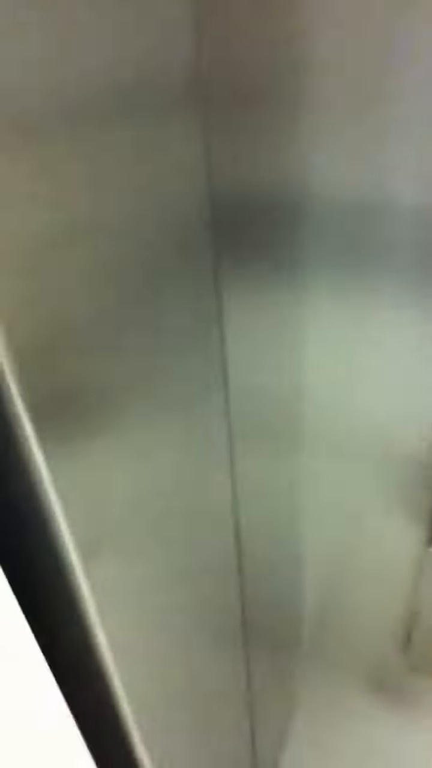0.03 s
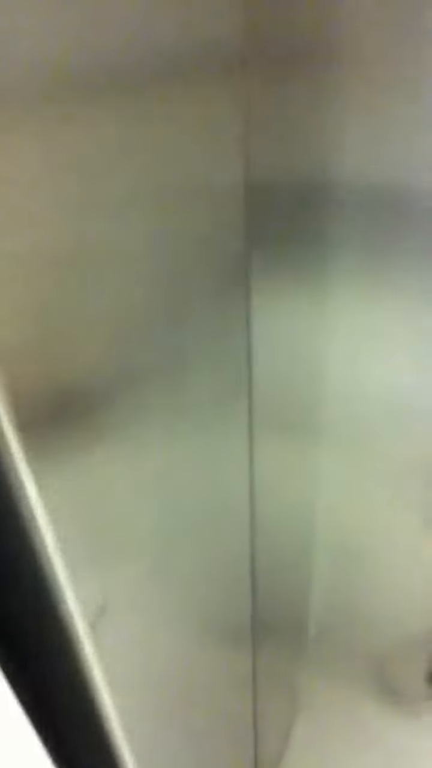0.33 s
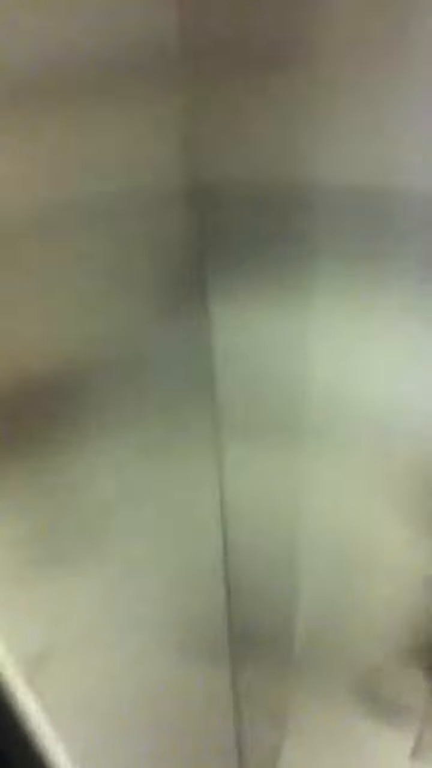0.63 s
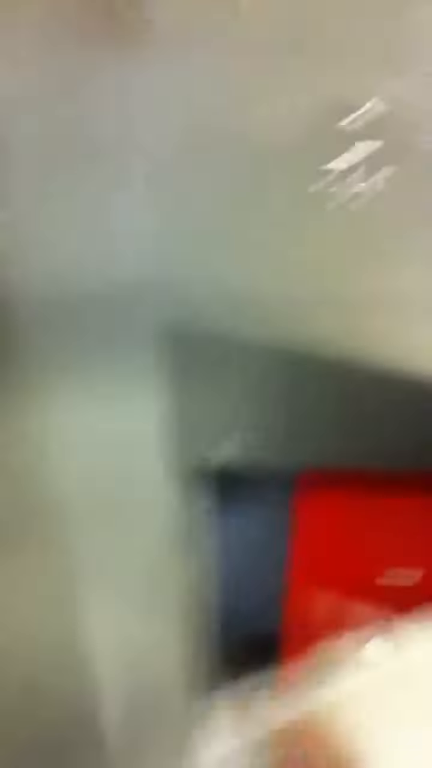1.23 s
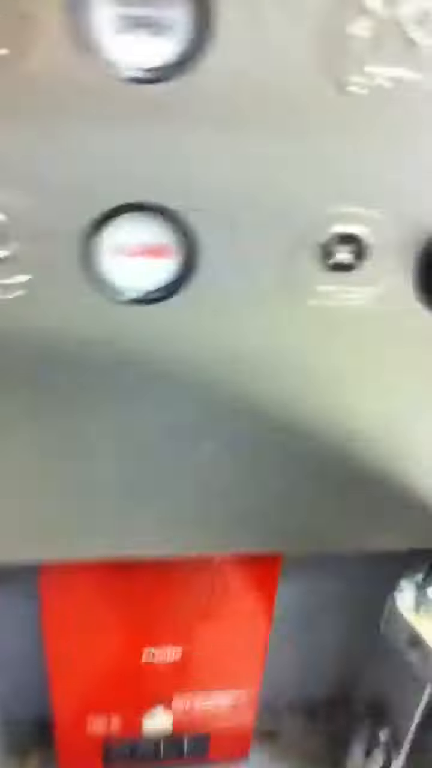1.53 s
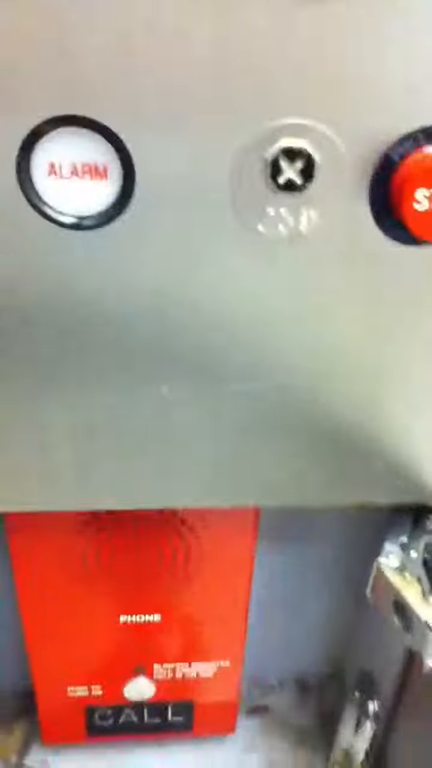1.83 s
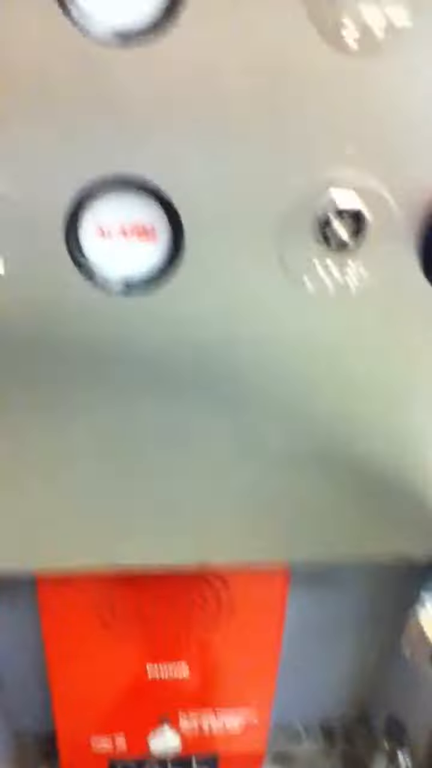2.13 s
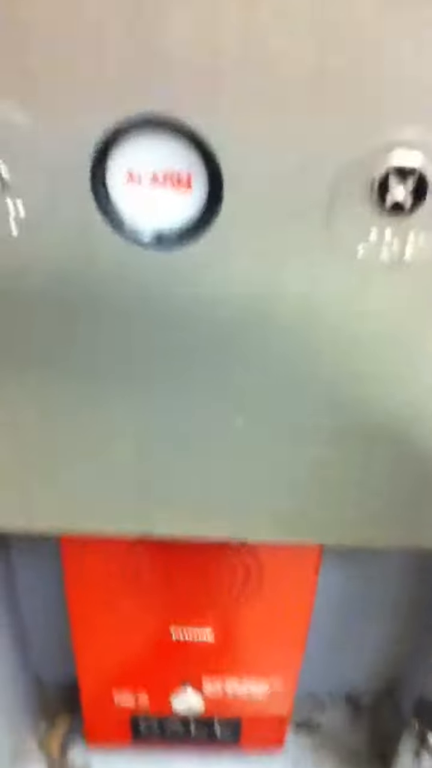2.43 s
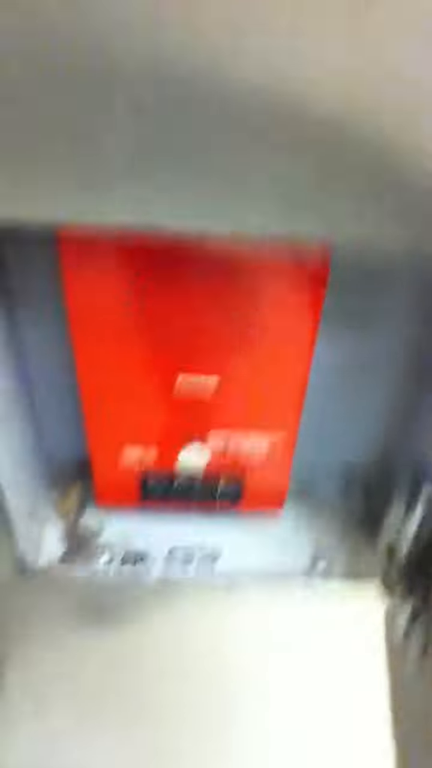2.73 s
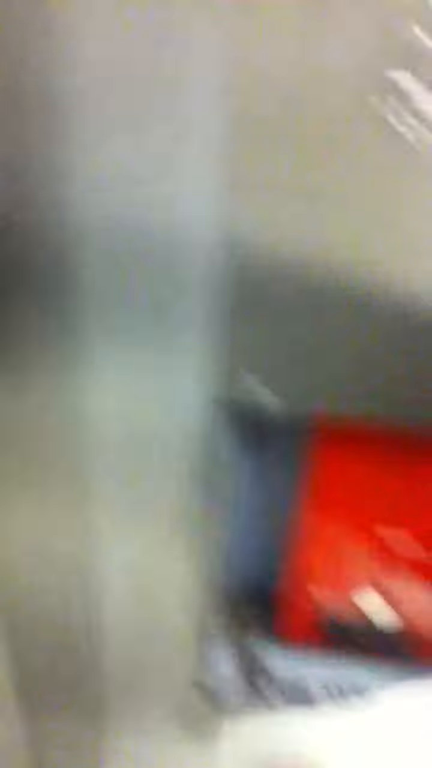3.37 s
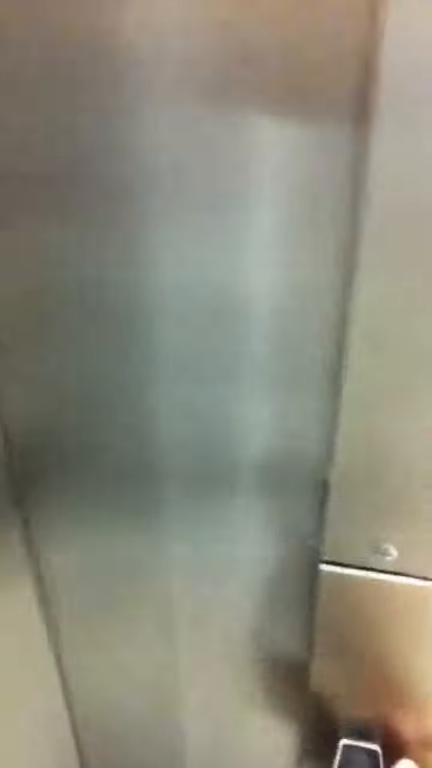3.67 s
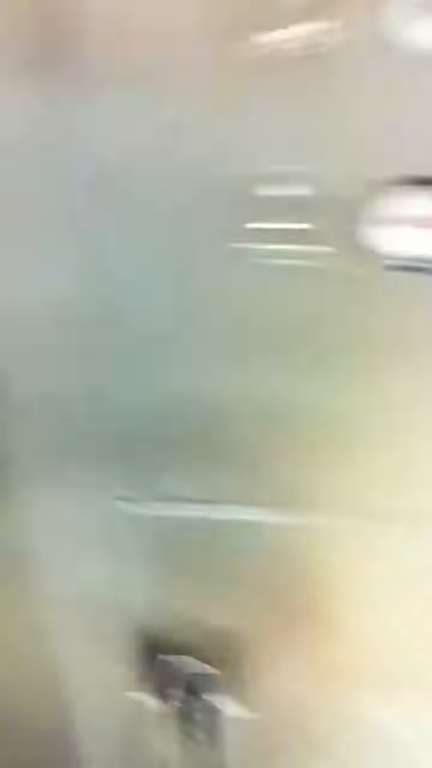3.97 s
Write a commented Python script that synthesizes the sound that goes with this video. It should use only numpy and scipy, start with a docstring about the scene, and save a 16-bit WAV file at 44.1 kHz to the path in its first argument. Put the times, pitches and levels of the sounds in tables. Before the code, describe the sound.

A small metal door bangs shut in an elevator at about 3.6 seconds, rattling briefly and making the walls boom. Before that, a faint clink sounds at the start, a hand scuffs, and the latch clicks at 1.7 seconds. Soft knocks and finger taps follow, then low panel thuds around 3.4 seconds. Ventilation and machinery hum steadily throughout.

```python
"""A little metal door bangs shut in a steel elevator cab, rattles and sets the walls booming.
Before the bang, this phone compartment door clicks at its latch and the cab panels thud in low modes.
Metal clinks, a hand scuffs and taps, and dull knocks sound around the cab.
Throughout, ventilation rushes and machinery hums through the cab's low resonances."""
import sys
import numpy as np
from scipy import signal
from scipy.fft import rfft, irfft
from scipy.io import wavfile
from scipy.ndimage import uniform_filter1d

SR = 44100
rng = np.random.default_rng(int(sys.argv[2]) if len(sys.argv) > 2 else 0)


def persist_wave(psi):
    """Save psi, clipped to +-1, as 16-bit WAV."""
    counts = np.round(np.clip(psi, -1, 1) * 32767).astype(np.int16)
    wavfile.write(sys.argv[1], SR, np.atleast_2d(counts).T)


N = 176400
T = np.arange(N) / SR
RING_T = T[:SR]  # 1 s per struck sound


def amp(db):
    """Decibels to gain."""
    return 10 ** (np.asarray(db) / 20)


def unit(x):
    """Scale to rms 1."""
    return x / np.sqrt(np.mean(x ** 2) + 1e-20)


def at_hz(points, hz):
    """Interpolate on a log-frequency axis."""
    f, value = np.transpose(points)
    return np.interp(np.log(hz + 1), np.log(f), value)


def level(points):
    """Gain over time from a dB curve."""
    return amp(np.interp(T, *np.transpose(points)))


def add(mix, start_s, sound):
    """Mix a sound in at start_s."""
    part = mix[round(start_s * SR):][:len(sound)]
    part += sound[:len(part)]


def noise(colour, size):
    """Noise of a given spectral shape, rms 1."""
    gain = amp(at_hz(colour, np.fft.rfftfreq(size, 1 / SR)))
    return unit(irfft(rfft(rng.standard_normal(size)) * gain, size))


def narrow(hz, width_hz):
    """Wavering tone: noise in one narrow resonance, rms 1."""
    f = np.fft.rfftfreq(N, 1 / SR)
    phases = np.exp(2j * np.pi * rng.random(len(f)))
    return unit(irfft(phases / (1 + ((f - hz) / width_hz * 2) ** 2), N))


def ring(modes, attack_s, in_phase=False):
    """Decaying modes of a struck object; a single shove starts them in phase."""
    out = np.zeros(SR)
    for hz, db, t60_s in modes:
        phase = 0 if in_phase else rng.random()
        out += amp(db - 60 * RING_T / t60_s) * np.sin(2 * np.pi * (hz * RING_T + phase))
    return np.minimum(RING_T / attack_s, 1) * out


def contact(colour, attack_s, decay_s, tail_db):
    """Noise crack plus cab reflections decaying band by band."""
    # cab reverberation (frequency [Hz], t60 [s])
    cab_t60 = [(150, 0.8), (500, 0.69), (1000, 0.43), (2000, 0.35), (4000, 0.35), (8000, 0.23),
               (15000, 0.2)]
    hz, t, bands = signal.stft(noise(colour, SR), SR, nperseg=256)
    fade = amp(-60 * t / at_hz(cab_t60, hz)[:, None])
    tail = signal.istft(bands * fade, SR, nperseg=256)[1][:SR]
    crack = noise(colour, SR) * np.exp(-RING_T / decay_s)
    return np.minimum(RING_T / attack_s, 1) * (crack + amp(tail_db) * tail)


def door(bang_s=3.6174):
    """Door swings, hits its frame, rattles and rings; the box behind it and the walls shake."""
    # swing hiss (time [s], rms level [dB])
    swing = [(3.1, -100), (3.3, -57), (3.4, -56.5), (3.6, -51), (3.8, -55.5), (3.95, -59), (4, -57)]
    # slam, then rattles (delay [s], level [dB])
    hits = [(0, -12.5), (.013, -32), (.041, -32), (.053, -30), (.073, -33.5)]
    # wall jolts (time [s], level [dB])
    booms = [(3.623, -19), (3.657, -18.5), (3.706, -19), (3.768, -28)]
    # spectra of swing, hit and hollow box (frequency [Hz], level [dB])
    swing_colour = [(300, 9), (1000, -7), (3000, 4), (6000, 0), (10000, -7), (15000, -23)]
    hit_colour = [(200, -1), (600, 0), (1300, 0.5), (1800, 3.5), (3000, 2), (5300, 0), (7500, -2.5),
                  (9000, -11), (11000, -23), (15000, -27)]
    box_colour = [(150, -5.5), (330, -3), (520, -1.5), (750, -8), (1300, -16), (2500, -20.5), (8000, -55)]
    # door and wall modes (frequency [Hz], level [dB], t60 [s])
    door_modes = [(936, -5.5, .14), (1385, -4, 0.086), (1610, -27, 0.055), (1760, 5, 0.056),
                  (2020, -16, 0.38), (2520, -4.5, .06), (2700, -4, 0.11), (3050, -16, 0.24),
                  (3270, -9, 0.18), (3780, -6, .06), (4070, -5.5, 0.092), (4490, -14, 0.22),
                  (4530, -4, 0.046), (4870, -12, 0.057), (5160, 3, 0.037), (5560, -10, 0.12),
                  (6070, -7, 0.092), (6320, -3, 0.044), (6420, -1, 0.06), (7600, -3, .05)]
    wall_modes = [(83.7, -19, 0.47), (151, -1.5, 0.17), (171.2, -1, 0.52), (203.6, -4.5, 0.71),
                  (240.4, 4.5, 0.35), (258.6, -1.5, 0.45), (292.3, -3.5, 0.39), (420.7, -13, 0.42),
                  (460, -6, 0.22), (521, -11, .55), (589, -14.5, 0.24), (653, -29, 0.54), (836, -26, 0.27),
                  (941, -22, 0.18)]
    out = level(swing) * noise(swing_colour, N)
    for delay_s, db in hits:
        crack = amp(-2) * contact(hit_colour, attack_s=0.0024, decay_s=0.004, tail_db=-8.5)
        metal = amp(-10) * ring(door_modes, attack_s=0.0028)
        add(out, bang_s + delay_s, amp(db) * (crack + metal))
    add(out, bang_s, amp(-18) * contact(box_colour, attack_s=0.028, decay_s=0.054, tail_db=-10))
    for start_s, db in booms:
        add(out, start_s, amp(db) * ring(wall_modes, attack_s=0.0027, in_phase=True))
    return out


def panel_thuds():
    """Shoves excite the low modes of the cab panels."""
    # shoves (time [s], level [dB])
    thuds = [(2.868, -25.5), (3.372, -16), (3.414, -13.5), (3.457, -11.5), (3.529, -15)]
    # panel modes (frequency [Hz], level [dB], t60 [s])
    modes = [(84, -19, 0.28), (116, -5, 0.15), (148.7, 0.5, 0.29), (163, 6.5, 0.089), (199.4, -1.5, 0.24),
             (241.3, 0, 0.184), (279.8, -3.5, 0.188), (336, -15, 0.42)]
    out = np.zeros(N)
    for start_s, db in thuds:
        add(out, start_s, amp(db) * ring(modes, attack_s=0.0075, in_phase=True))
    return out


def latch():
    """Latch snaps, rings and shakes the walls."""
    # click (time [s], level [dB], wall boom level [dB])
    clicks = [(1.711, -26, -20.5)]
    # snap spectrum (frequency [Hz], level [dB])
    colour = [(200, 2), (600, 15), (1400, 6.5), (2600, -3.5), (4500, 0.5), (6000, 0), (9000, -2.5),
              (15000, -21)]
    # latch and wall modes (frequency [Hz], level [dB], t60 [s])
    latch_modes = [(1477, -6, .2), (1920, -11, 0.24), (2340, -4, 0.056), (3100, -6, 0.066),
                   (4070, -3, 0.052), (4270, 6.5, 0.023), (5880, 7, 0.018), (8250, -11, .07),
                   (8870, -18, 0.053)]
    wall_modes = [(159, -16, 0.22), (228, -3, 0.2), (260, -2, .2), (323, -1, 0.23)]
    out = np.zeros(N)
    for start_s, db, boom_db in clicks:
        snap = contact(colour, attack_s=0.00073, decay_s=0.003, tail_db=-11.5)
        metal = amp(-9.5) * ring(latch_modes, attack_s=0.0006)
        boom = ring(wall_modes, attack_s=0.0025, in_phase=True)
        add(out, start_s, amp(db) * (snap + metal) + amp(boom_db) * boom)
    return out


def knocks():
    """Dull contacts around the cab, each with a faint ring."""
    # knocks (time [s], level [dB], attack [s])
    hits = [(.5, -43.5, .006), (.563, -44.5, 0.0016), (.655, -45.5, 0.0046), (1.916, -40, 0.0061),
            (1.95, -57, .006), (2.007, -37, 0.0087), (2.09, -42.5, 0.0087), (2.354, -38, 0.01),
            (2.418, -39.5, 0.0088), (2.569, -46, .01), (2.68, -43.5, 0.0074), (2.829, -40, 0.03),
            (2.961, -35.5, 0.0038), (3.036, -34.5, 0.0033), (3.116, -39.5, 0.0056), (3.375, -32.5, 0.01),
            (3.435, -34, 0.013), (3.5, -40, 0.01), (3.549, -37, 0.017), (3.737, -37, .004),
            (3.812, -35.5, 0.0022), (3.878, -38, .008)]
    # knock spectrum (frequency [Hz], level [dB])
    colour = [(150, -8), (400, 2), (600, 0), (950, 0.5), (1300, -6), (1800, -7.5), (2800, -18), (6000, -23),
              (14000, -73)]
    # ringing modes (frequency [Hz], level [dB], t60 [s])
    modes = [(390.6, -3.5, 0.9), (506, 3.5, 0.68), (603, -4, 0.92), (653, -2, 1), (788, 4, 0.21),
             (781, 0.5, 0.2), (894, -6.5, 0.78), (948, -10, 0.26), (1110, -2, 0.29), (1340, -5.5, 0.44)]
    out = np.zeros(N)
    for start_s, db, attack_s in hits:
        knock = contact(colour, attack_s, decay_s=0.0066, tail_db=-2.5)
        add(out, start_s, amp(db) * (knock + amp(-9) * ring(modes, attack_s)))
    return out


def clink():
    """Small metal piece rings and scrapes in three quick contacts."""
    # contacts (time [s], level [dB])
    hits = [(.078, -54), (.085, -36.5), (.101, -48)]
    # metal modes (frequency [Hz], level [dB], t60 [s])
    modes = [(2654, -1, .22), (3250, -11, .12), (3410, -10, .15), (4160, -17, .6), (4740, -11, .18),
             (5087, -5, .21), (7973, -6, .11), (8080, -4, .09), (9520, -12, .11), (9857, -17, .2)]
    # scrape spectrum (frequency [Hz], level [dB])
    colour = [(1000, -20), (2700, 3), (3500, -2), (5000, -3), (6500, -2), (8200, -8), (9000, -5),
              (15000, -20)]
    out = np.zeros(N)
    for start_s, db in hits:
        metal = ring(modes, attack_s=0.0013)
        scrape = amp(-9) * contact(colour, attack_s=0.0027, decay_s=0.006, tail_db=-1)
        add(out, start_s, amp(db) * (metal + scrape))
    return out


def hand():
    """Hand scuffs the door lightly; fingers tap crisply on the panel."""
    # scuffs (time [s], level [dB], attack [s])
    scuffs = [(.497, -48.5, 0.0056), (.66, -49, .002), (1.343, -53, .002), (1.41, -53, 0.018),
              (1.555, -39.5, 0.016), (1.591, -42, 0.011), (2.975, -50, .003), (3.051, -49.5, .003)]
    # taps (time [s], level [dB])
    taps = [(.649, -34), (2.967, -32.5), (3.040, -31.5), (3.117, -40.5)]
    # scuff and tap spectra (frequency [Hz], level [dB])
    scuff_colour = [(300, -49), (1500, 14), (3200, 10.5), (4500, 1), (7000, 2), (10000, -18), (15000, -26)]
    tap_colour = [(400, -18), (1100, 6.5), (2000, 2), (3200, -5.5), (4500, -6), (6500, -11), (9000, -27),
                  (15000, -34)]
    out = np.zeros(N)
    for start_s, db, attack_s in scuffs:
        add(out, start_s, amp(db) * contact(scuff_colour, attack_s, decay_s=0.0083, tail_db=-4))
    for start_s, db in taps:
        add(out, start_s, amp(db) * contact(tap_colour, attack_s=0.0016, decay_s=0.0028, tail_db=-11))
    return out


def machinery(drone_hz=163.9, mains_hz=120.2, waver=0.34):
    """Wavering drone over mains hum and narrow hum bands."""
    # drone (time [s], rms level [dB])
    drone_curve = [(0, -38.5), (.8, -39.5), (1.1, -35.5), (1.65, -33), (2.2, -34), (2.6, -37), (3.05, -33),
                   (3.4, -38.5), (4, -42)]
    # mains hum, varying as the microphone moves through the cab (time [s], rms level [dB])
    mains_curve = [(0, -46.5), (.3, -37.5), (1.3, -36.5), (1.6, -38.5), (2.1, -39.5), (2.7, -43.5),
                   (3.2, -41), (4, -42)]
    # hum bands (frequency [Hz], rms level [dB], width [Hz])
    bands = [(57.5, -51, 2), (78.5, -45, 11), (193.2, -48, 2), (205, -43.5, 12), (239, -45, 22.5),
             (297.8, -46.5, 14), (323, -49, 28)]
    drone = np.sqrt(2) * np.sin(2 * np.pi * drone_hz * T) + waver * narrow(drone_hz, width_hz=5.1)
    mains = np.sqrt(2) * np.sin(2 * np.pi * mains_hz * T)
    hum = sum(amp(db) * narrow(hz, width_hz) for hz, db, width_hz in bands)
    return level(drone_curve) * unit(drone) + level(mains_curve) * mains + hum


def ventilation():
    """Rushing air with a drifting spectrum and a faint whistle."""
    # air spectrum (frequency [Hz], level [dB])
    colour = [(25, -7), (45, -10), (64, -17.5), (91, -19.5), (110, -8.5), (130, -6.5), (150, -1),
              (180, -4.5), (215, -4.5), (250, -8.5), (277, -11.5), (320, -10.5), (360, -16.5), (420, -15.5),
              (520, -22.5), (930, -29), (1700, -35.5), (2050, -37.5), (2400, -38.5), (3500, -40.5),
              (4800, -43), (6500, -47), (9000, -50), (15800, -56.5)]
    # swell before weighting (time [s], level [dB])
    swell = [(0, 1.5), (.4, -0.5), (.58, 5.5), (.8, 1), (1.4, -0.5), (1.9, 0.5), (2.4, -3), (2.75, -3),
             (3.0, 1.5), (3.3, -2.5), (4, 4)]
    # swell weight per band (frequency [Hz], weight [-])
    swell_weight = [(40, 1), (110, 1.5), (170, 0), (300, 1.4), (700, 0.62), (1500, 0), (8000, 0.25)]
    # air whistle (time [s], rms level [dB])
    whistle_curve = [(0, -58.5), (.6, -61), (.7, -57), (1.1, -61), (1.6, -63), (4, -63.5)]
    hz, t, bands = signal.stft(noise(colour, N), SR, nperseg=1024, noverlap=768)
    # random patches, smoothed over time, then frequency
    patches = uniform_filter1d(rng.standard_normal(bands.shape[::-1]), size=14, axis=0)
    patches = unit(uniform_filter1d(patches, size=12, axis=1)).T
    drift_db = 1.5 * patches / (1 + hz[:, None] / 4000)
    swell_db = at_hz(swell_weight, hz)[:, None] * np.interp(t, *np.transpose(swell))
    air = signal.istft(bands * amp(drift_db + swell_db), SR, nperseg=1024, noverlap=768)[1][:N]
    return amp(-33) * air + level(whistle_curve) * narrow(hz=2008, width_hz=116)


def scene():
    """Mono sum of all sources."""
    background = ventilation() + machinery()
    return (background + clink() + latch() + hand() + knocks() + panel_thuds() + door())[None]


def record(dry, low_hz=57, high_hz=15850):
    """Small microphone: deep bass loss, then a steep band limit."""
    highpass = signal.butter(3, low_hz, btype="high", fs=SR, output="sos")
    lowpass = signal.firwin(511, high_hz, window=("kaiser", 9), fs=SR)
    return signal.oaconvolve(signal.sosfilt(highpass, dry), lowpass[None], "same")


dry = scene()
out = record(dry)
persist_wave(out)
```